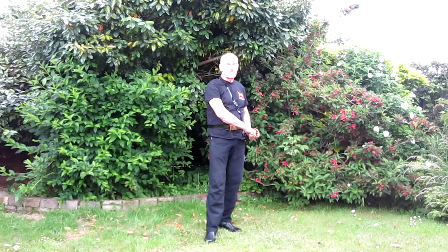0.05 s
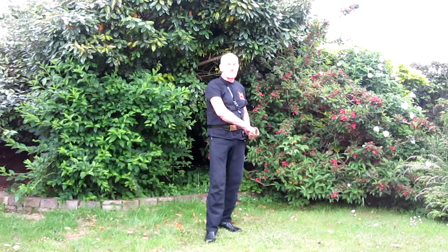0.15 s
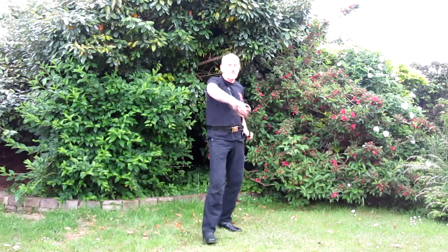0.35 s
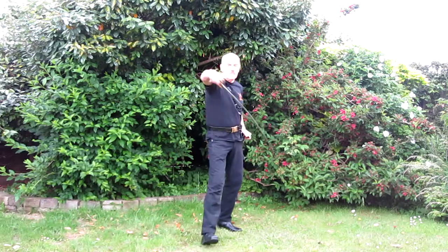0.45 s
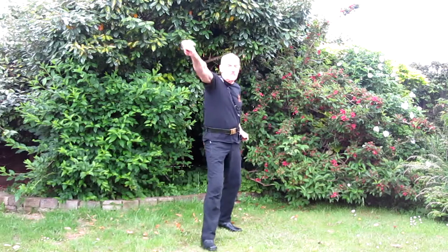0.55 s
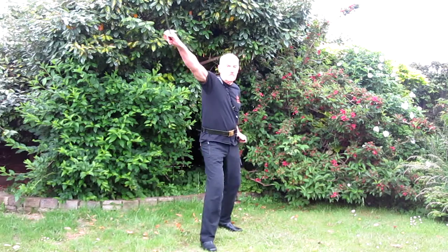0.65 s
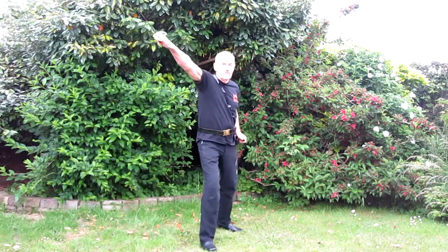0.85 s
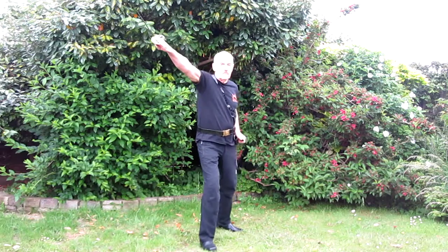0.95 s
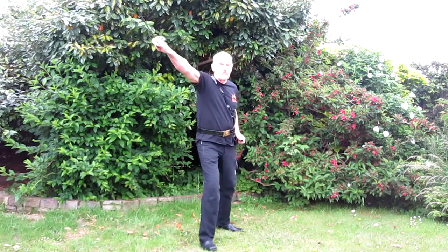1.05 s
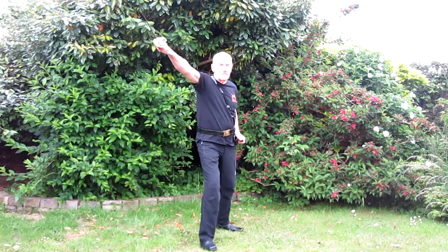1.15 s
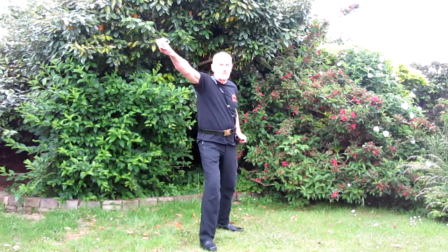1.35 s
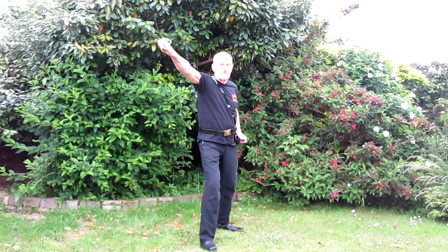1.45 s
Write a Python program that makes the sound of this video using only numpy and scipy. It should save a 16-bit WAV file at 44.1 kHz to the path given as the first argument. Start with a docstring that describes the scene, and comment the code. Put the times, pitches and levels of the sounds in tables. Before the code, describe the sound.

A steel blade scrapes out of its scabbard from about 0.15 seconds, swelling and rising in pitch until a loud, bright clink at 0.4. Smaller clinks and a soft falling swish follow around 0.5. Clothing rustles at 0.7, with tiny dry ticks at 0.75 and 1.1. Distant birds chirp three times after 1.25. Faint traffic, a low engine drone and a thin whine continue throughout in the garden.

```python
"""A blade is drawn in a garden, some metres from a camera with one microphone. Far traffic, an
engine's drone and the camera's faint whine run throughout. Steel scrapes out of the scabbard's
throat, swelling and rising, then clinks as the tip comes free, hard enough to duck a limiter.
The blade swishes through the air as the scrape's hiss trails off. Then come a soft rustle of
clothing and two dry ticks, and far birds chirp last."""
import sys
import numpy as np
from scipy import signal
from scipy.fft import rfft, irfft
from scipy.io import wavfile
from scipy.ndimage import uniform_filter1d

SR = 44100
rng = np.random.default_rng(int(sys.argv[2]) if len(sys.argv) > 2 else 0)


def store_pcm(level_fs):
    """Save levels as 16-bit WAV."""
    pcm = np.round(np.clip(level_fs, -1, 1) * 32767).astype(np.int16)
    wavfile.write(sys.argv[1], SR, np.atleast_2d(pcm).T)


N = 66150
T = np.arange(N) / SR


def scrape():
    """Grit under the sliding blade rings the steel; the throat's resonance climbs as the blade leaves."""
    # The stroke. Each row: start in seconds, level in dB, brightness in dB, throat pitch in Hz,
    # throat level in dB.
    stroke = [(.14, -62, -4, 4000, -10), (.19, -46, -1, 4000, -8), (.205, -44, -3, 4000, -8),
              (.216, -35.5, 0, 4100, -6), (.235, -32.5, -1, 4300, -5), (.258, -31, -3, 4400, -7),
              (.272, -24, 3, 4500, -9), (.284, -22, 1, 4500, -7), (.296, -26, -1, 4600, -11),
              (.32, -21.5, -2, 6000, -6), (.336, -24.5, -3, 5900, -8), (.364, -24, -6, 6100, -3),
              (.38, -22.5, -2, 6500, -4), (.398, -22, -4, 6900, 0), (.408, -24, -1, 8000, 2),
              (.418, -25, 2, 9300, 3), (.427, -17, 1, 9500, -1), (.436, -28, 2, 9000, -2),
              (.48, -39, 4, 9000, 0)]
    # The scrape's body and its bright edge. Each row: frequency in Hz, level in dB.
    body_colour = [(410, -35), (700, -25.5), (1740, -11.5), (1870, -12.5), (2040, -9.5), (3370, -2.5),
                   (4540, -3), (6000, -4), (9000, -10.5), (11700, -33), (19800, -120)]
    edge_colour = [(3820, -35), (6500, -2.5), (7860, -8.5), (8990, -3), (11500, -4), (13200, -17.5),
                   (14400, -21), (15500, -28)]
    rub = shimmer(grit(), depth_db=1.8) * amp(.8 * wander(250))  # the blade chatters
    body = coloured(rub, [(300, -58)] + list(body_colour) + [(11000, -29)])
    edge = coloured(rub, [(5000, -32.5)] + list(edge_colour))
    throat = evened(resonate(rub, curve(stroke, column=3), width_hz=1900))
    ring = evened(signal.oaconvolve(rub, steel(T[:6000]))[:N])
    brightness, throat_gain = amp(curve(stroke, column=2)), amp(curve(stroke, column=4))
    blend = body + brightness * (edge + amp(-3.5) * ring) + throat_gain * throat
    power = 1 + brightness ** 2 + throat_gain ** 2
    return blend / np.sqrt(power) * amp(curve(stroke)) * inside(stroke)


def shimmer(x, depth_db):
    """Narrow patches of the spectrum flare and fade as the contact point moves along the blade."""
    spectra = signal.stft(x, nperseg=256, noverlap=192)[2]
    patches = uniform_filter1d(rng.standard_normal(spectra.shape), size=3, axis=0)
    patches = evened(uniform_filter1d(patches, size=12, axis=1))
    return evened(signal.istft(spectra * amp(depth_db * patches), nperseg=256, noverlap=192)[1][:N])


def steel(t, beat_hz=69.3):
    """Blade and fittings ring after one blow; closely split modes beat."""
    # The steel's modes. Each row: frequency in Hz, level in dB, seconds to fall 60 dB.
    modes = [(5900, -12, .04), (6640, -11, .1), (8190, -8, .1), (8430, -7, .18), (8640, -4, .06),
             (8870, -2, .11), (9100, -3, .05), (9360, -4, .13), (9600, -3, .04), (9850, -4, .035),
             (10780, -8, .025), (11700, -8, .02)]
    ring = np.zeros(len(t))
    for hz, db, t60 in modes:
        phase, spread, beat_phase = rng.random(3)
        beating = .5 + np.cos(2 * np.pi * (beat_hz * (.5 + spread) * t + beat_phase))
        ring += amp(db - 60 * t / t60) * np.sin(2 * np.pi * (hz * t + phase)) * beating
    return ring


def clinks():
    """The tip knocks free: each hit is a short bright crack and the steel's ring."""
    # Metal hits. Each row: start in seconds, crack level in dB, ring against crack in dB, crack in Hz.
    hits = [(.4024, -11, -22, 7300), (.4097, -12, -22, 9000), (.4113, -6, -24, 9300),
            (.4124, -5, -24, 8800), (.4199, -9, -20, 9500), (.4210, -4, -20, 10000), (.4220, 5, -26, 10000),
            (.4239, -2, -21, 9500), (.4714, -22, -16, 9300), (.4785, -26, -12, 9300),
            (.4802, -18, -14, 10000), (.4812, -12, -13, 10000), (.4832, -16, -16, 9300),
            (.4856, -18, -18, 9000)]
    out, t = np.zeros(N), T[:12000]
    attack = np.minimum(t / .0007, 1)
    for start, db, ring_db, hz in hits:
        ring = amp(ring_db) * attack * steel(t)
        out = place(out, start, amp(db) * (crack(t, hz, half_s=.00018) + ring))
    return out


def swish():
    """Air shed from the swung blade, falling in pitch as it slows."""
    # The swing. Each row: time in seconds, level in dB, pitch in Hz, bandwidth in Hz.
    swing = [(.455, -52, 3960, 1950), (.478, -36, 3430, 2000), (.498, -49, 3160, 2000),
             (.509, -39.5, 2830, 1000), (.518, -44.5, 1700, 1970), (.532, -40.5, 1260, 1790),
             (.56, -46, 1050, 1190), (.62, -60, 940, 1180)]
    hz, width = curve(swing, column=2), curve(swing, column=3)
    narrow, wide = (evened(resonate(rng.standard_normal(N), hz, w)) for w in (width.min(), width.max()))
    share = (width - width.min()) / np.ptp(width)
    return (np.sqrt(1 - share) * narrow + np.sqrt(share) * wide) * amp(curve(swing)) * inside(swing)


def tail_and_rustle():
    """The scrape's bright, grainy hiss trails off, then clothing rustles softly."""
    # The scrape's tail, then cloth from 0.7 s. Each row: time in seconds, level in dB.
    swells = [(.42, -43), (.46, -52), (.5, -45), (.56, -47.5), (.62, -57), (.66, -61), (.70, -50.5),
              (.73, -48.5), (.77, -50.5), (.79, -54.5), (.9, -60)]
    # The tone of both. Each row: frequency in Hz, level in dB.
    colour = [(2000, -10), (4000, -4), (7000, -6.5), (10000, -7.5), (13000, -15), (15600, -24)]
    return coloured(grit(), colour) * amp(curve(swells)) * inside(swells)


def ticks():
    """Two small dry ticks with no ring."""
    # Each row: start in seconds, peak in dB, pitch in Hz, half length in seconds.
    clicks = [(.7612, -30, 10500, .00005), (1.1082, -33.5, 9200, .0001)]
    return sum(place(np.zeros(N), start, amp(db) * crack(T[:200], hz, half_s))
               for start, db, hz, half_s in clicks)


def birds():
    """Far birds chirp, each call a quick pure glide."""
    # Each row: start in seconds, length in seconds, peak in dB, first and last pitch in Hz.
    chirps = [(1.275, .014, -51, 3900, 3500), (1.345, .025, -47, 4400, 3200),
              (1.438, .015, -47, 3550, 4050)]
    out = np.zeros(N)
    for start, length, db, from_hz, to_hz in chirps:
        progress = np.arange(0, length, 1 / SR) / length
        turns = np.cumsum(from_hz + (to_hz - from_hz) * progress) / SR
        out = place(out, start, amp(db) * np.sin(np.pi * progress) * np.sin(2 * np.pi * turns))
    return out


def traffic():
    """Far traffic blurs into a dark, gently wavering wash."""
    # The wash's tone. Each row: frequency in Hz, level in dB.
    colour = [(15, -49), (25, -8), (82, -8.5), (156, -5), (178, -9.5), (227, -8.5), (282, -11),
              (567, -10.5), (685, -11.5), (1030, -7.5), (1490, -11), (1850, -8.5), (4500, -23.5),
              (6060, -21.5), (6930, -25), (9830, -26), (15500, -44)]
    level_db = -43.5 + .74 * wander(5.83) + .5 * wander(80)
    return amp(level_db) * coloured(rng.standard_normal(N), colour)


def engine(base_hz=30.92, sag_hz_per_s=.98, waver_db=1):
    """An engine drones on four wavering harmonics as its pitch sags."""
    # Each row: time in seconds, then the levels of harmonics 2, 3, 4 and 5 in dB.
    levels = [(0.0, -63, -52, -64, -60), (0.036, -51, -49, -54.5, -52), (0.396, -69, -55, -54, -55.5),
              (0.822, -54.5, -54.5, -55.5, -58), (0.972, -61, -62, -61, -52), (1.136, -62, -49, -57, -56),
              (1.366, -56, -76, -51.5, -56.5), (1.448, -59, -53, -56, -62), (1.5, -63, -63, -56, -53)]
    turns = np.cumsum(base_hz - sag_hz_per_s * T) / SR
    out = np.zeros(N)
    for k in range(2, 6):
        rms = amp(curve(levels, column=k - 1) + waver_db * wander(6.3))
        out += np.sqrt(2) * rms * np.sin(2 * np.pi * (k * turns + rng.random()))
    return out


def camera_whine(flips_per_s=29.33, snap=9):
    """The camera's thin tones warble as their polarity flips."""
    # Each row: frequency in Hz, level in dB.
    tones = [(5558, -89), (5845, -61.5), (6132, -60.5)]
    polarity = np.tanh(snap * np.sin(np.pi * flips_per_s * T))
    return polarity * sum(np.sqrt(2) * amp(db) * np.sin(2 * np.pi * hz * T) for hz, db in tones)


def garden_echo(x, t60_s=.3, dull_hz=6500):
    """Thin, dulled reflections from hedge, lawn and wall."""
    t = T[:SR // 3]
    taps = rng.choice([-1., 1.], len(t)) * (rng.random(len(t)) < .05)
    taps *= amp(-60 * t / t60_s) * (t > .004)
    dull = signal.sosfilt(signal.butter(2, dull_hz, fs=SR, output="sos"), x)
    return signal.fftconvolve(dull, taps / np.linalg.norm(taps))[:N]


def grit(per_s=26000, spread_db=.6):
    """Friction as dense random clicks of uneven size, rms 1."""
    clicks = rng.standard_normal(N) * (rng.random(N) < per_s / SR)
    return evened(clicks * amp(spread_db * np.minimum(rng.exponential(1, N), 5)))


def crack(t, hz, half_s):
    """A burst of a few cycles, peaking three half lengths in."""
    return np.exp(-(t / half_s - 3) ** 2) * np.cos(2 * np.pi * hz * (t - 3 * half_s))


def resonate(x, hz, width_hz):
    """A two-stage resonance that sweeps along the curve hz."""
    turn = np.exp(2j * np.pi * np.cumsum(hz) / SR)
    r = np.exp(-np.pi * width_hz / SR)
    return 2 * (turn * signal.lfilter([(1 - r) ** 2], [1, -2 * r, r * r], x / turn)).real


def coloured(x, points):
    """Equalises a signal through (Hz, dB) points, rms 1."""
    point_hz, db = np.transpose(points)
    hz = np.fft.rfftfreq(len(x), 1 / SR)
    gain = amp(np.interp(np.log(hz + 1), np.log(point_hz + 1), db))
    return evened(irfft(rfft(x) * gain, len(x)))


def wander(rate_hz):
    """Random drift in the three octaves below rate_hz, rms 1."""
    rates = np.geomspace(rate_hz / 8, rate_hz, 16)
    return evened(sum(np.sin(2 * np.pi * (hz * T + rng.random())) for hz in rates))


def curve(table, column=1):
    """Reads one column against time."""
    table = np.array(table, float)
    return np.interp(T, table[:, 0], table[:, column])


def inside(table):
    """A gate, open while the table lasts, with 10 ms fades."""
    return np.clip(np.minimum(T - table[0][0], table[-1][0] - T) * 100, 0, 1)


def place(mix, start_s, sound):
    return mix + np.pad(sound, (round(start_s * SR), N))[:N]


def amp(db):
    return 10 ** (np.asarray(db) / 20)


def evened(x):
    return x / np.sqrt(np.mean(x ** 2) + 1e-20)


def scene():
    """The blade and its reflections over the garden's bed, the same in both channels."""
    blade = scrape() + clinks() + swish()
    mono = blade + amp(-12) * garden_echo(blade) + tail_and_rustle() + ticks()
    mono += birds() + traffic() + engine() + camera_whine()
    return np.array([mono, mono])


def record(dry, limit_db=-5.5, recover_db_per_s=120, cutoff_hz=15640):
    """A limiter ducks everything at the loudest clinks and recovers; a steep low-pass trims the top."""
    peak_db = 20 * np.log10(abs(dry).max(0) + 1e-9)
    fall_db = T * recover_db_per_s
    held_db = np.maximum.accumulate(peak_db + fall_db) - fall_db
    over_db = np.maximum(held_db - limit_db, 0)
    ducked = dry / amp(uniform_filter1d(np.roll(over_db, shift=-15), size=30))  # smooth look-ahead
    low_pass = signal.firwin(511, cutoff_hz, window=("kaiser", 9), fs=SR)
    return signal.oaconvolve(ducked, low_pass[None], "same")


dry = scene()
out = record(dry)
store_pcm(out)
```